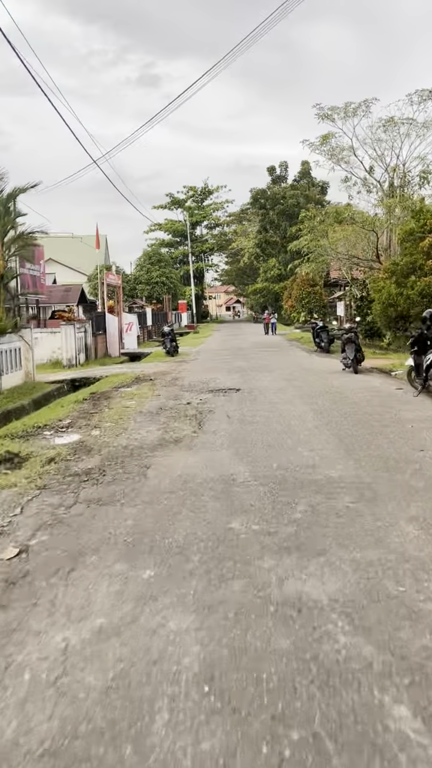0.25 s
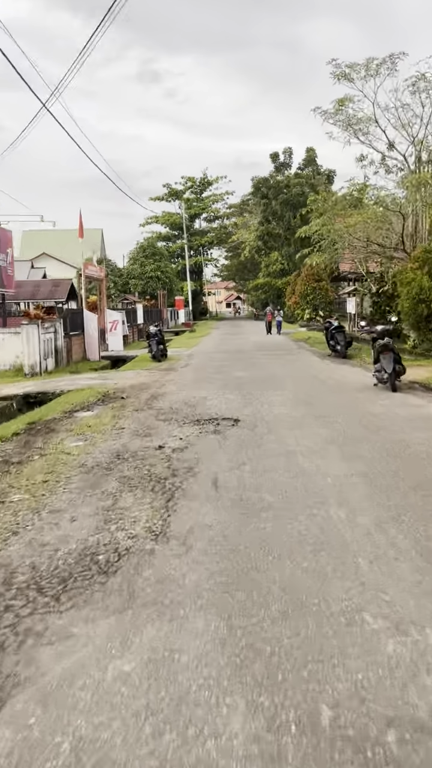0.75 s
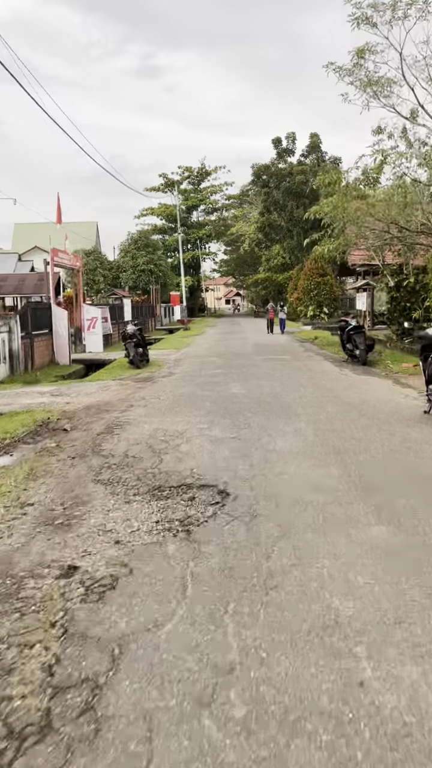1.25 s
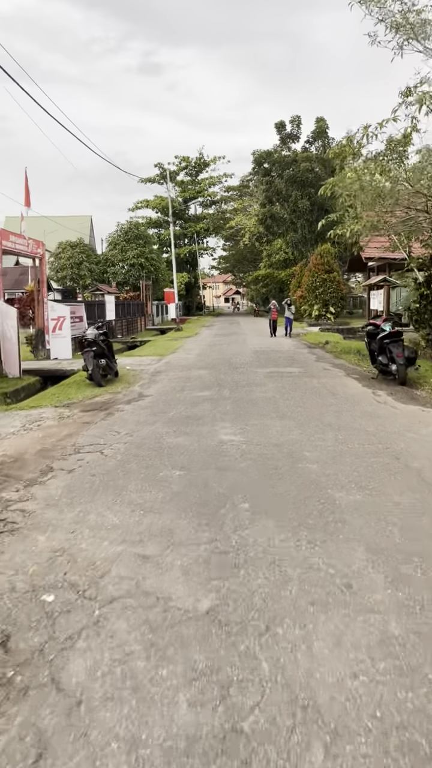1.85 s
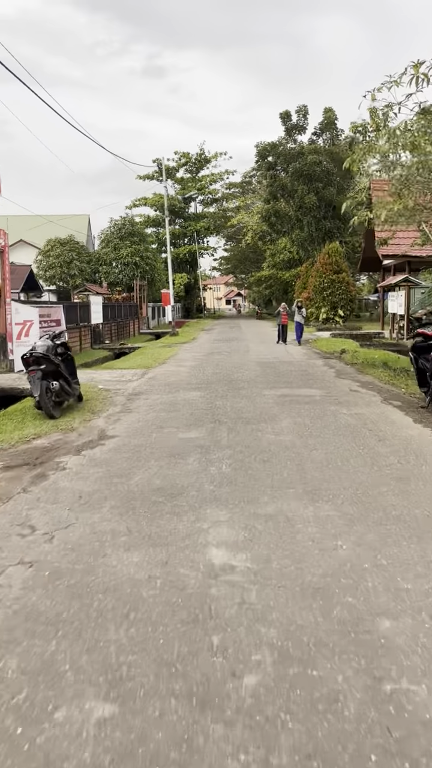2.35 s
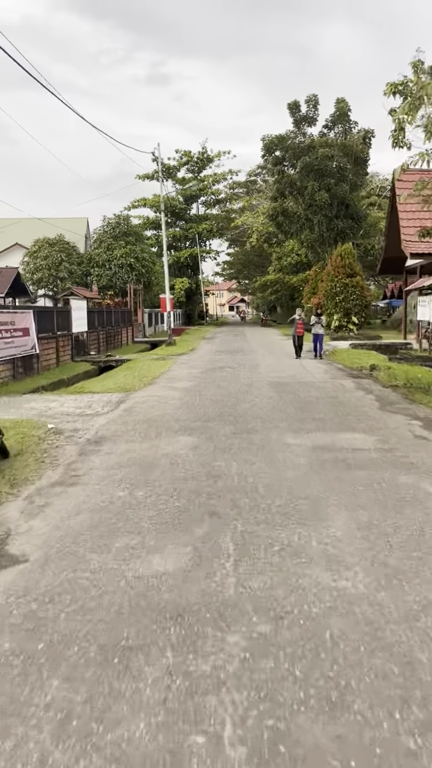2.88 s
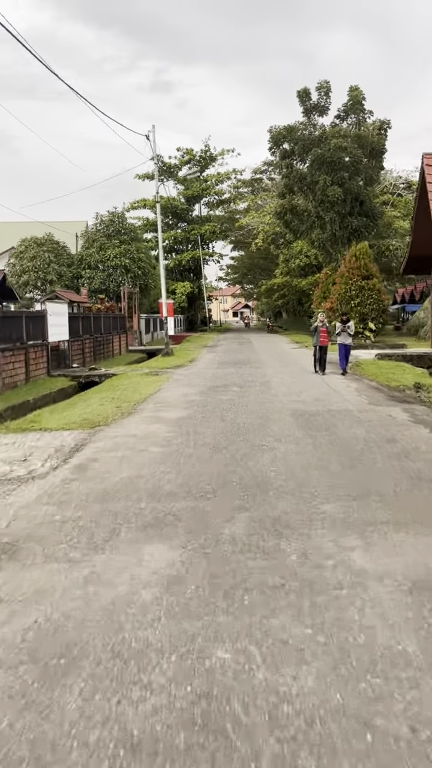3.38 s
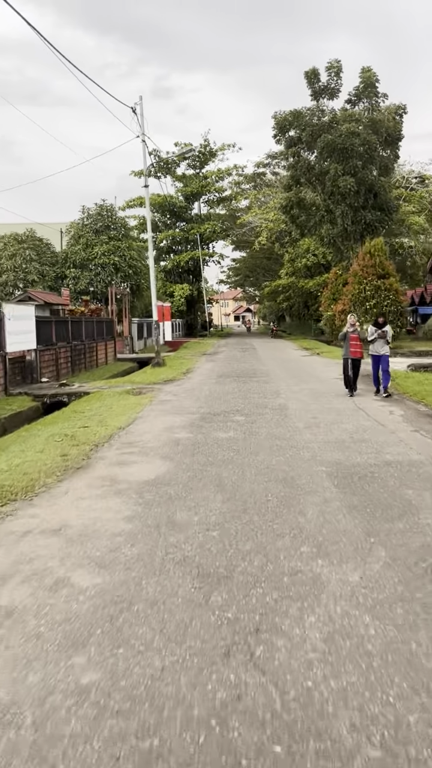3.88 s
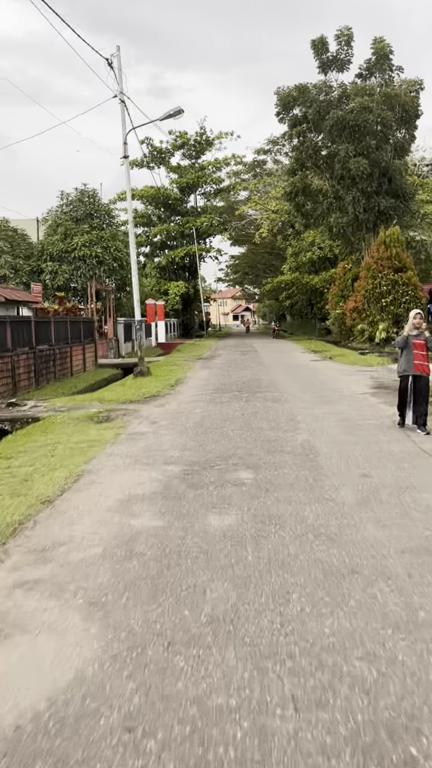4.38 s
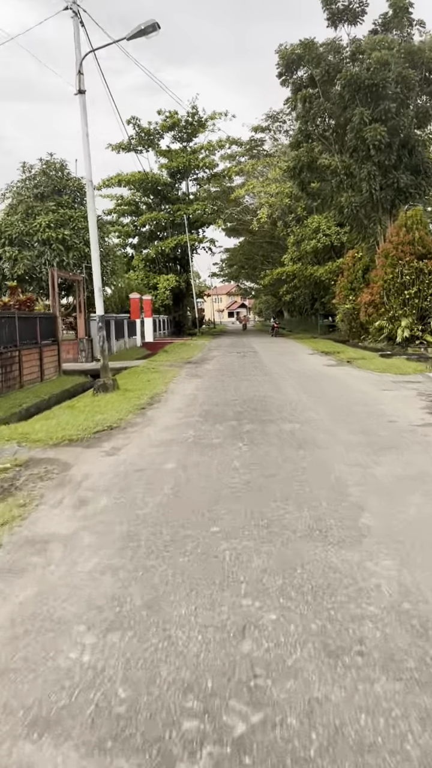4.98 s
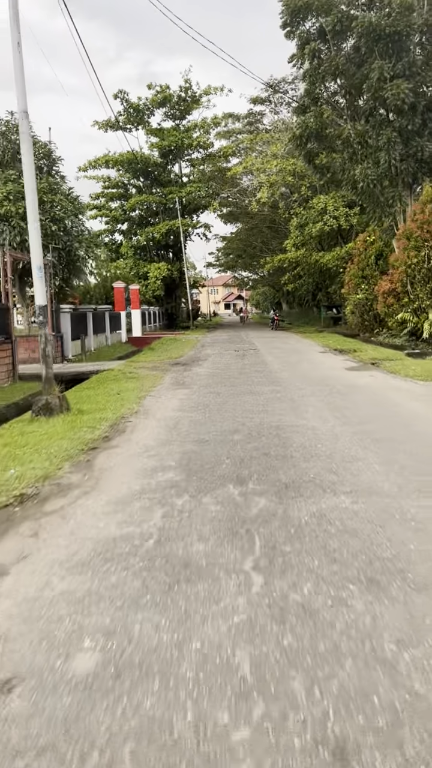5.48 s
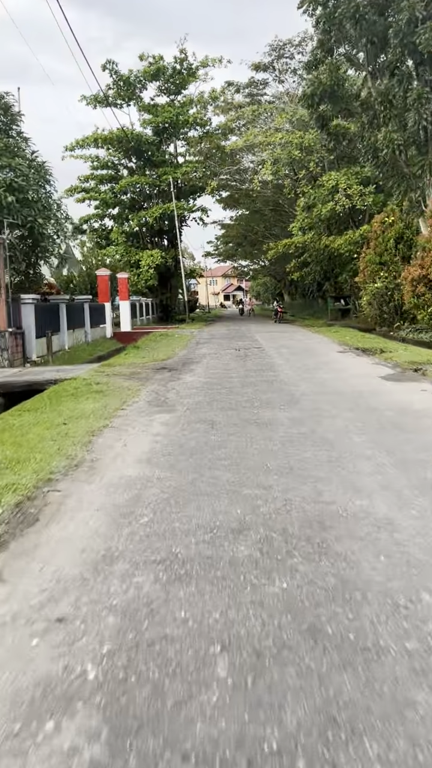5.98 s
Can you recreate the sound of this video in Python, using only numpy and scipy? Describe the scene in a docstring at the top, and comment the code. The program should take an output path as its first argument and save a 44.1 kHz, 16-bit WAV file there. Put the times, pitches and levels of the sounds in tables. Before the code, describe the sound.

A one-cylinder scooter cruises along a worn road for about six seconds, heard close up from a phone held by someone riding on it. The exhaust makes a low, steady throb, with a faint whine, a soft mechanical hiss and occasional short metallic pings above it. Wind rumbles on the microphone throughout, with irregular thumps that are thickest between 3 and 4.4 seconds. At about 0.6 seconds the rider eases the throttle and the throb deepens, then evens out again by 2.3 seconds. From about 4.3 to 5.1 seconds both throb and wind drop noticeably. They return, and the throb deepens once more around 5.6 seconds as the throttle eases again. Bumps make plastic panels rattle softly, mostly between 0.5 and 1.1 seconds and now and then later. A few tiny, very high metal squeaks come mainly between 3.4 and 5.3 seconds.

```python
"""Scooter ride on a worn village road

A one-cylinder scooter cruises along, heard from a phone held by someone riding on it. The exhaust
throbs with each firing, the engine case rings and pings, the cam chain whines and the valves hiss.
Twice the rider eases the throttle and the throb deepens; in between, throb and wind drop for a moment.
Wind thumps the microphone, and bumps make the panels rattle and a small metal joint squeak."""
import sys
import numpy as np
from scipy import signal
from scipy.fft import rfft, irfft
from scipy.io import wavfile
from scipy.ndimage import uniform_filter1d

SR = 44100
rng = np.random.default_rng(int(sys.argv[2]) if len(sys.argv) > 2 else 0)


def log_audio(samples):
    """Write samples as a 16-bit WAV file to the path given in sys.argv[1]."""
    # one column per channel
    frames = np.atleast_2d(samples).T
    # limit to full scale, then quantise
    limited = np.clip(frames, -1, 1)
    pcm = np.round(limited * 32767).astype(np.int16)
    wavfile.write(sys.argv[1], SR, pcm)


N = 275184
TIME = np.arange(N) / SR
FREQ = np.maximum(np.arange(N // 2 + 1) * SR / N, 1)


def undb(db):
    """Turn decibels into a number to multiply by."""
    return 10 ** (np.asarray(db) / 20)


def unit(x):
    """Scale a signal to an average strength (rms) of 1."""
    return x / np.sqrt(np.mean(x ** 2))


def curves(table):
    """Join the points of a table with straight lines in time, one curve per value column."""
    s, *columns = np.transpose(table)
    return [np.interp(TIME, s, c) for c in columns]


def noise():
    """White noise."""
    return rng.standard_normal(N)


def walk(rate):
    """A smooth random wobble that changes about rate times a second."""
    return unit(irfft(rfft(noise()) * np.exp(-(FREQ / rate) ** 2), N))


def colour(x, points):
    """Shape a sound by (frequency [Hz], level [dB]) points, fading it away beyond both ends."""
    hz, db = np.transpose(points)
    gain = undb(np.interp(np.log(FREQ), np.log(hz), db))
    edges = np.minimum(FREQ / hz[0], 1) ** 2 * np.minimum(hz[-1] / FREQ, 1) ** 2
    return irfft(rfft(x) * gain * edges, N)


def ring(x, modes, swells=None):
    """Let x shake a part that rings at its own pitches (modes), each with its own swell if given."""
    bodies = [undb(db) / (1 + 1j * hz / (2 * width) * (FREQ / hz - hz / FREQ)) ** 2
              for hz, width, db in modes]
    if swells is None:
        return unit(irfft(rfft(x) * sum(bodies), N))
    return unit(irfft(sum(rfft(x * swell) * body for swell, body in zip(swells, bodies)), N))


def resonance(hz, centre_hz, width_hz):
    """How strongly a part answers a tone: 1 at its own pitch, less to either side."""
    return 1 / (1 + ((hz - centre_hz) / width_hz) ** 2)


def knocks(cycle, delay, fade, base):
    """Noise that flares up once per firing; delay and fade are fractions of an engine cycle."""
    return noise() * (base + np.exp(-((cycle - delay) % 1) / fade))


def stereo(mid, side, pan_db):
    """Left and right from what the ears share (mid) and what differs (side), leaning left by pan_db."""
    return np.array([(mid + side) * undb(pan_db / 2), (mid - side) * undb(-pan_db / 2)])


def add(out, s, sound):
    """Mix a short stereo sound in at s seconds."""
    start = int(np.clip(s * SR, 0, N - 1))
    out[:, start:start + sound.shape[1]] += sound[:, :N - start]


def wind(eddy_db=2.5):
    """Swirls of air tumble over the microphone, with a rougher flutter that differs between the ears."""
    # tone colour of the shared and the differing wind: (frequency [Hz], relative level [dB])
    mid_colour = [(130, 8), (180, 4.5), (240, 0), (330, 1), (450, -6), (620, -16), (1000, -16.5),
                  (2000, -49)]
    side_colour = [(120, -0.5), (230, -6.5), (340, -2), (480, -1), (600, -7), (760, -5), (1100, -16.5),
                   (1500, -30), (2500, -49.5)]
    mid = colour(noise() * undb(eddy_db * walk(51)), mid_colour)
    side = colour(noise() * undb(eddy_db * walk(130)), side_colour)
    return stereo(mid, side, pan_db=0.37) / np.std(mid)


def small_buffets(wind_db, count=6, offset_db=-6.5, scatter_db=4, hz=253, scatter_octaves=0.11):
    """List a few small wind thumps at random moments, stronger when the wind is louder."""
    moments, chance = rng.integers(0, N, count), rng.standard_normal((count, 3))
    return [(i / SR, wind_db[i] + offset_db - scatter_db * size,
             hz * 2 ** (scatter_octaves * pitch), 1, 2 * lean)
            for i, (size, pitch, lean) in zip(moments, chance)]


def buffets(wind_db, lead_s=.02, wake_s=0.014, wake_db=-10, side_db=-7,
            puff_db=-9, puff_hz=640, puff_s=0.0036):
    """A swirl of air hits as a few sharp pressure swings and a rough puff, then trails a short flutter."""
    # big wind thumps: (time [s], level [dB], pitch [Hz], fade [cycles], lean to the left [dB])
    big_buffets = [(.075, -14, 335, 1, 0), (.246, -11.5, 242, 1.8, 5.5), (.774, -21, 312, 1.2, 0),
                   (.881, -14, 322.7, 1.5, -1), (1.022, -18, 251.1, 0.91, 2), (1.153, -8.5, 252, 0.95, -1),
                   (1.173, -15, 226, 1.03, 3), (1.432, -20, 370, 1.3, 1), (1.692, -16, 228, 0.98, 6),
                   (2.066, -14.5, 205, 0.85, 5), (2.132, -18, 280, 1, 4), (2.202, -19, 300, 0.87, -3),
                   (2.747, -12.5, 234, 1.89, -1), (2.811, -16, 239.5, 1, 5), (3.077, -10, 224, 1, 1),
                   (3.113, -17.5, 290, 0.57, -4), (3.6, -9.5, 220, 0.61, -1), (3.739, -11.5, 258.9, 1.1, 2),
                   (3.746, -9.5, 250, .8, -1), (3.801, -12.5, 255.3, 0.84, 4),
                   (3.829, -14, 269.8, 1.13, -1), (3.905, -15, 282, 1.08, 0), (4.047, -22.5, 296, 1.1, -3),
                   (4.162, -14.5, 305, 1.3, -2), (4.242, -8, 286, 0.69, 2), (4.286, -17, 480, 0.98, 0),
                   (4.319, -8.5, 440, 1.06, -2), (4.393, -16, 610, 1.1, -5), (4.57, -16.5, 418, 0.85, -9),
                   (5.162, -18.5, 440, .6, 1), (5.519, -12.5, 215, 1.01, 1), (6.212, -19, 229.7, 0.99, 2)]
    out, t = np.zeros((2, N)), TIME[:SR // 10]
    puff_band = signal.butter(3, [puff_hz * 0.52, puff_hz * 1.48], "band", fs=SR, output="sos")
    for s, db, hz, cycles, pan_db in big_buffets + small_buffets(wind_db):
        swing = hz * (t - lead_s)
        slap = -np.cos(2 * np.pi * swing) * np.exp(-np.abs(swing / cycles)) * np.minimum(2 * t / lead_s, 1)
        band = signal.butter(2, [hz * 0.55, hz * 1.46], "band", fs=SR, output="sos")
        wake = signal.sosfilt(band, rng.standard_normal((2, len(t))) * t * np.exp(-2 * t / wake_s))
        mid, side = wake / np.abs(wake).max(axis=1, keepdims=True)
        puff = signal.sosfilt(puff_band, rng.standard_normal(len(t)))
        puff *= np.exp(-np.abs(t - lead_s) / puff_s)
        hit = slap + undb(puff_db) * puff / np.max(np.abs(puff))
        add(out, s - lead_s, undb(db) * stereo(hit, 0, pan_db))
        add(out, s - .005, undb(db) * stereo(undb(wake_db) * mid, undb(side_db) * side, pan_db))
    return out


def rattles(rise_s=0.0026, decay_s=0.0086, grain_db=1.7, top_hz=4900):
    """Loose plastic panels chatter over bumps in short, soft bursts of fine ticks."""
    # panel rattles: (time [s], relative level [dB], centre frequency [Hz])
    bumps = [(0.46, -33.5, 2100), (0.618, -41, 3400), (.678, -44, 3400), (.712, -48, 3400),
             (0.85, -45, 3660), (.882, -44, 3200), (.97, -40.5, 3480), (1.011, -40, 2793),
             (1.047, -38, 2408), (1.105, -43, 4220), (2.861, -38, 2300), (3.733, -44, 2439),
             (4.094, -37, 2408), (4.151, -36.5, 2408), (5.157, -40, 2608), (5.55, -43, 3200),
             (5.665, -42, 3201), (5.958, -41, 2646)]
    out, t = np.zeros((2, N)), TIME[:SR // 12]
    shape = (1 - np.exp(-t / rise_s)) * np.exp(-t / decay_s)
    dull = signal.butter(4, top_hz, fs=SR, output="sos")
    for s, db, hz in bumps:
        band = signal.butter(3, [hz * 0.41, hz * 1.6], "band", fs=SR, output="sos")
        ticks = rng.standard_normal((2, len(t))) * undb(grain_db * rng.standard_normal(len(t)))
        chatter = unit(signal.sosfilt(np.vstack([band, dull]), ticks))
        add(out, s - .003, undb(db + 8) * chatter * shape)
    return out


def squeaks(rise_s=.001, scrape=1.2, tick_db=-13, tick_s=0.0022):
    """Shaken by the road, a small metal joint catches with a tick and rubs with rough, very high tones."""
    # rubs of the joint: (time [s], level of high tones [dB], level of low tone [dB], fade [s])
    rubs = [(.358, -39.5, -51, 0.017), (2.275, -51, -49, .012), (3.449, -37, -47, 0.0098),
            (3.736, -42, -41.5, 0.014), (4.097, -49, -40, 0.0065), (4.218, -47, -40, 0.0071),
            (4.25, -47, -39, .004), (5.011, -40, -51, 0.013), (5.16, -46, -46, .008),
            (5.29, -46, -48, 0.018)]
    # the joint's own tones: (pitch [Hz], relative level [dB])
    high_tones = [(13140, -14), (14560, 0), (14980, -9)]
    low_tones = [(7950, -3.5)]
    out, t = np.zeros((2, N)), TIME[:SR // 5]
    treble = signal.butter(2, 4000, "high", fs=SR, output="sos")
    for s, high_db, low_db, decay_s in rubs:
        shape = (1 - np.exp(-t / rise_s)) * np.exp(-t / decay_s)
        tick = signal.sosfilt(treble, rng.standard_normal((2, len(t)))) * np.exp(-t / tick_s)
        add(out, s, undb(low_db + tick_db) * tick)
        for tones, level_db in ((high_tones, high_db), (low_tones, low_db)):
            for hz, db in tones:
                slip = scrape * hz / SR * np.cumsum(rng.standard_normal((2, len(t))), axis=1) / 2
                add(out, s, undb(level_db + db) * shape * np.sin(2 * np.pi * hz * t + slip))
    return out


def cover_whirr(cycle):
    """The working engine shakes its loosest cover into a metallic whirr that comes and goes."""
    # the cover's own tones: (pitch [Hz], width [Hz], relative level [dB])
    modes = [(2295, 52, 1.5), (3970, 45, 2), (4880, 33, -13)]
    # loudness of the whirr: (time [s], level [dB])
    loudness = [(0, -47.5), (.4, -53), (.7, -63.5), (2.9, -58), (3.25, -52), (3.4, -55), (3.62, -48.5),
                (3.85, -58), (4.45, -56), (4.65, -46), (4.85, -56), (5.15, -50.5), (5.4, -68), (6.24, -58)]
    (level_db,) = curves(loudness)
    sheet = undb(level_db) * ring(knocks(cycle, delay=1, fade=.3, base=0.99), modes)
    return stereo(sheet, -.15 * sheet, pan_db=3.5)


def valve_gear(cycle, throttle, hiss_db, cover_db, grain_db=1.5, tick=0.46, slack=0.6):
    """Chain and valves hiss, ring the thin covers and tick once a cycle, harder with the throttle shut."""
    # tone colour of the shared and the differing hiss: (frequency [Hz], relative level [dB])
    mid_colour = [(300, -10), (800, 4.5), (1250, 5), (1600, 2), (2200, -1.5), (2800, -2.5), (3700, -4),
                  (4500, -8.5), (5300, -14), (6200, -21.5), (10000, -17), (11800, -34), (15500, -23.5)]
    side_colour = [(300, -10), (900, 16), (1400, -3.5), (2000, -4), (2600, -2.5), (3150, -1), (3700, -8.5),
                   (4500, -11), (5500, -8.5), (7000, -15), (8500, -30.5), (13500, -18.5), (15500, -37)]
    # the covers' own tones: (pitch [Hz], width [Hz], relative level [dB])
    cover_modes = [(1899, 83, -2), (1973, 53, 0.5), (2218, 86, -1.5), (2650, 130, -11), (3289, 52, -0.5),
                   (3402, 64, -1), (3962, 62, -4.5), (4340, 59, -6.5), (4820, 71, -15)]
    flicker_db = walk(26)
    ticking = 1 + (tick + slack * (1 - throttle)) * np.exp(-((cycle - 0.63) % 1) / 0.064)
    mid, side, taps = (undb(grain_db * walk(600) + flicker_db) * ticking * noise() for _ in range(3))
    mid, side = colour(mid, mid_colour), colour(side, side_colour)
    hiss = undb(hiss_db) * stereo(mid, side, pan_db=-0.5) / np.std(mid)
    covers = undb(cover_db) * ring(taps, cover_modes)
    return hiss + stereo(covers, -.15 * covers, pan_db=1.5)


def chain_whine(cycle, firing_hz, throttle, gain_db=-39, stray=0.35, waver_db=2.5, pulsing=0.25):
    """The cam chain whines in step with the engine, loudest near its housing's pitch; each firing tugs it."""
    # chain tones: (multiple of the firing rate, relative level [dB], change at full throttle [dB])
    tones = [(34, 0, -3.5), (35, -12.5, 8.5), (40, 0.5, -8)]
    mesh = 0
    for k, db, open_db in tones:
        level = undb(db + open_db * throttle + waver_db * walk(37))
        housing = resonance(k * firing_hz, centre_hz=871, width_hz=58)
        mesh += level * housing * np.exp(1j * (2 * np.pi * k * cycle + stray * walk(10)))
    tug = 1 + pulsing * np.cos(2 * np.pi * (cycle - .7))
    whine = np.sqrt(2) * undb(gain_db) * tug * mesh
    return stereo(whine.imag, 0.82 * whine.real, pan_db=4.0)


def case_pings(rise_s=0.0014, decay_s=0.006, rough=0.21):
    """The engine case's ring flares briefly into short, rough pings."""
    # louder pings of the case ring: (time [s], peak level [dB], pitch [Hz], lean to the left [dB])
    pings = [(.665, -32, 854.5, 5), (.735, -29, 807, 1), (.949, -25, 799.5, 0), (1.402, -24, 790, 7),
             (1.518, -23.5, 904, 1), (1.562, -33, 865, 0), (2.451, -21, 824, 2.5), (2.658, -30, 790, 6),
             (2.713, -28, 902, 1), (3.627, -32, 714.6, -1), (4.026, -24, 786, 3), (4.882, -24.5, 804.5, 2),
             (5.026, -27, 831, -5), (6.175, -28.5, 890, 0)]
    out, t = np.zeros((2, N)), TIME[:SR // 16]
    shape = (1 - np.exp(-t / rise_s)) ** 2 * np.exp(-t / decay_s)
    for s, db, hz, pan_db in pings:
        slip = rough * hz / SR * np.cumsum(rng.standard_normal((2, len(t))), axis=1) * 2 * np.pi
        mid, side = shape / shape.max() * np.sin(2 * np.pi * hz * t + slip)
        add(out, s - .002, undb(db) * stereo(mid, 0.24 * side, pan_db))
    return out


def engine_case(cycle, delay=.57, clatter_db=-1, scatter_db=2.7, wander_db=3.5):
    """Each firing taps the case over a loose clatter; each of its tones swells and fades on its own."""
    # the case's own tones: (pitch [Hz], width [Hz], relative level [dB])
    modes = [(814.6, 30.3, 7.5), (879, 107, -1), (995, 300, -14.5)]
    firings = np.floor(cycle - delay)
    taps = np.diff(firings, prepend=firings[0]) * undb(-scatter_db * noise())
    swells = [undb(wander_db * walk(4)) for _ in modes]
    case = ring(taps, modes, swells)
    shared, apart = (undb(clatter_db) * ring(knocks(cycle, delay, fade=.2, base=.75), modes, swells)
                     for _ in range(2))
    side = 0.28 * np.roll(case, SR // 4000) + 0.24 * shared + 0.34 * apart
    return stereo(0.32 * case + 1.09 * shared, side, pan_db=2.0)


def intake(cycle, firing_hz, throttle, gain_db=-41.5, waver_db=4.5, open_db=6):
    """The air box hums with whichever engine overtone is near its pitch, louder with the throttle open."""
    drone = 0
    for k in range(11, 15):
        air_box = resonance(k * firing_hz, centre_hz=331.9, width_hz=8)
        drone += air_box * undb(waver_db * walk(15)) * np.exp(2j * np.pi * k * cycle)
    return undb(gain_db + open_db * throttle) * stereo(drone.imag, .6 * drone.real, pan_db=-0.5)


def pipe_gains(firing_hz, throttle, boom_hz=97.2, rise_hz=30, width_hz=23.1):
    """Strength of the exhaust tones at 2 to 5 times the firing rate; throttle raises the boom's pitch."""
    # exhaust loudness: (time [s], throb level [dB], deepest bass level [dB])
    loudness = [(0, -18, -16), (.5, -16, -17), (.64, -12.5, -22), (1.15, -13.5, -21), (1.8, -16.5, -23),
                (2.1, -17.5, -21.5), (2.4, -15.5, -24.5), (2.8, -16, -21), (3.3, -16.5, -22),
                (3.85, -17, -20), (4.17, -17, -24), (4.33, -26.5, -32), (4.85, -29, -32.5),
                (5.25, -16.5, -33), (5.52, -20, -33), (5.72, -13, -39), (6.24, -15, -25)]
    throb_db, bass_db = curves(loudness)
    boom = resonance(np.outer([3, 4, 5], firing_hz), boom_hz + rise_hz * throttle, width_hz)
    return np.vstack([undb(bass_db), undb(throb_db) * boom / np.linalg.norm(boom, axis=0)])


def burble(cycle, throttle, gains, shut_db=-17, open_db=-18, hz=182, width_hz=45):
    """With the throttle shut the fuel burns raggedly and puffs through the pipe; opening it calms this."""
    puffs = ring(knocks(cycle, delay=0.38, fade=0.18, base=0.059), [(hz, width_hz, 0)])
    level = np.linalg.norm(gains, axis=0) * undb(shut_db + open_db * throttle)
    return level * stereo(puffs, 0, pan_db=1.0)


def exhaust(cycle, throttle, gains, smear=2.15, uneven_db=.5, sway=0.046, bass_waver_db=2.04,
            churn_db=-9, churn_open_db=-3.5, churn_growth=0.83, surge=0.093):
    """Uneven firings throb in the pipe; throttle shifts the lowest tones ahead, blurring it to a drone."""
    # weaker overtones: (multiple of the firing rate, level against the tone at 5 times that rate [dB])
    overtones = [(6, -12), (7, -19), (8, -35.5), (9, -31.5), (15, -29)]
    # tone colour of the churning gas: (frequency [Hz], relative level [dB])
    rumble_colour = [(18, -23), (30, -18), (45, -2.5), (70, 6), (110, 5), (150, 0), (220, -30.5)]
    turn = 2 * np.pi * cycle
    bass, *boom = (g * np.sin(k * turn + smear * throttle * (k < 4)) for k, g in enumerate(gains, 2))
    bass = bass * undb(bass_waver_db * (walk(11) - 1.5))
    buzz = sum(undb(db + 2.4 * walk(4.1)) * np.sin(k * turn + rng.uniform(0, 2 * np.pi))
               for k, db in overtones)
    pipe = np.sqrt(2) * (bass + sum(boom) + gains[-1] * buzz) * undb(uneven_db * walk(12))
    # the gas rumbles along with the pipe, most at each firing and with the throttle shut
    strength = uniform_filter1d(np.linalg.norm(gains, axis=0), SR // 4) ** churn_growth
    churn = undb(churn_db + churn_open_db * throttle) * strength * (1 + surge * np.cos(turn))
    mid, side = (churn * unit(colour(noise(), rumble_colour)) for _ in range(2))
    return stereo(pipe + mid, sway * pipe * walk(28) + 0.47 * side, pan_db=3.0)


def scene(cruise_hz=27):
    """Engine speed and throttle steer the engine's sound; wind, pings, rattles and squeaks join in."""
    # engine speed, sagging briefly when the throttle snaps shut: (time [s], firing rate [Hz])
    engine_speed = [(0.0, 27.87), (0.2, 28.43), (0.42, 28.3), (0.56, 29.04), (0.7, 24.78), (0.8, 27.76),
                    (0.95, 27.42), (1.4, 26.06), (1.7, 25.54), (1.9, 24.85), (2.08, 26.65), (2.3, 25.57),
                    (2.8, 26.32), (3.1, 26.71), (3.4, 27.14), (3.9, 27.6), (4.25, 27.91), (4.6, 28.24),
                    (5.17, 28.77), (5.45, 27.9), (5.58, 25.88), (5.72, 27.54), (6.24, 26.23)]
    # the rider's hand: (time [s], throttle [0 shut to 1 open])
    hand = [(0, 1), (.56, 0.91), (.66, 0.33), (1.5, 0.04), (2.3, 1), (3.2, 0.95), (4.85, 0.79), (5.45, 0.7),
            (5.6, 0.3), (6.24, 0.4)]
    # air rushing over the phone: (time [s], level [dB])
    airflow = [(0, -23.5), (.4, -24), (1.15, -25), (1.8, -27.5), (2.12, -23), (2.4, -26.5), (2.8, -23.5),
               (3.4, -24), (4.2, -23), (4.45, -28.5), (5.03, -29.5), (5.25, -25.5), (5.9, -25.5),
               (6.24, -24.5)]
    (firing_hz,), (throttle,), (wind_db,) = curves(engine_speed), curves(hand), curves(airflow)
    cycle = np.cumsum(firing_hz) / SR  # counts up by one per firing
    extra_hz = firing_hz - cruise_hz
    # more throttle and speed quieten the case but bring out the hiss and the covers
    case_db = -36.5 - 2.4 * throttle - 1.2 * extra_hz
    hiss_db = -43.13 + 0.97 * throttle + 0.8 * extra_hz
    cover_db = -50 + 0.42 * throttle + 0.75 * extra_hz
    gains = pipe_gains(firing_hz, throttle)
    engine = exhaust(cycle, throttle, gains) + burble(cycle, throttle, gains)
    engine += intake(cycle, firing_hz, throttle) + undb(case_db) * engine_case(cycle)
    engine += valve_gear(cycle, throttle, hiss_db, cover_db) + cover_whirr(cycle)
    air = undb(wind_db) * wind() + buffets(wind_db)
    return engine + chain_whine(cycle, firing_hz, throttle) + air + case_pings() + rattles() + squeaks()


def record(dry, ceiling=.92, fade_s=.004, top_hz=15800):
    """The phone rounds off the loudest peaks and cuts the highest treble; both ends fade quickly."""
    rounded = dry / (1 + (dry / ceiling) ** 8) ** (1 / 8)
    fade = np.minimum(np.minimum(TIME, TIME[-1] - TIME) / fade_s, 1)
    treble_cut = signal.ellip(10, .1, 80, top_hz, fs=SR, output="sos")
    return signal.sosfilt(treble_cut, rounded * fade)


dry = scene()
out = record(dry)
log_audio(out)
```